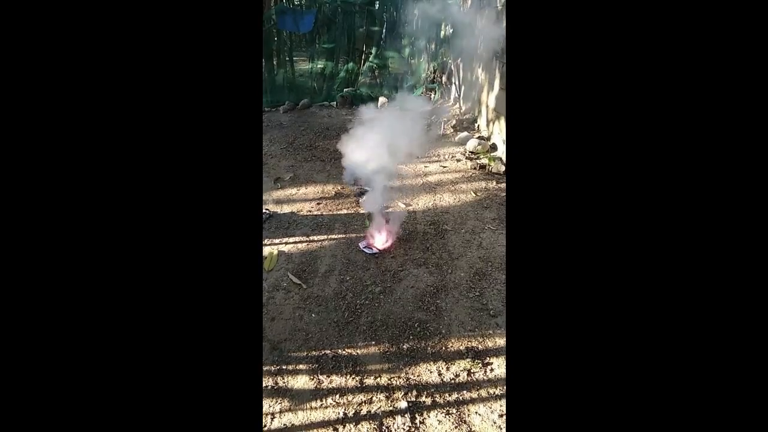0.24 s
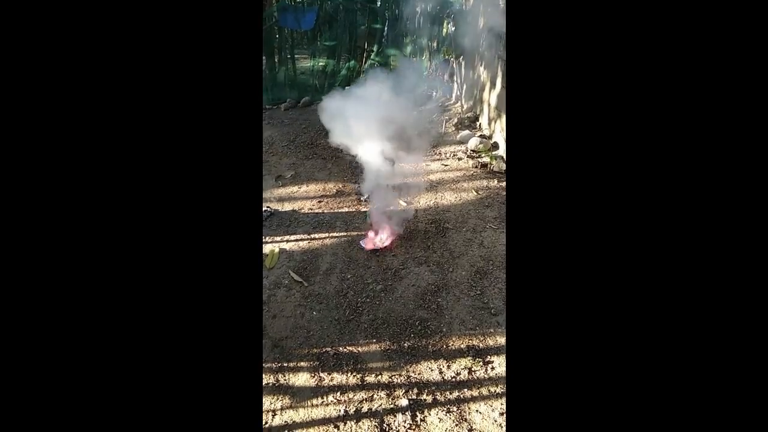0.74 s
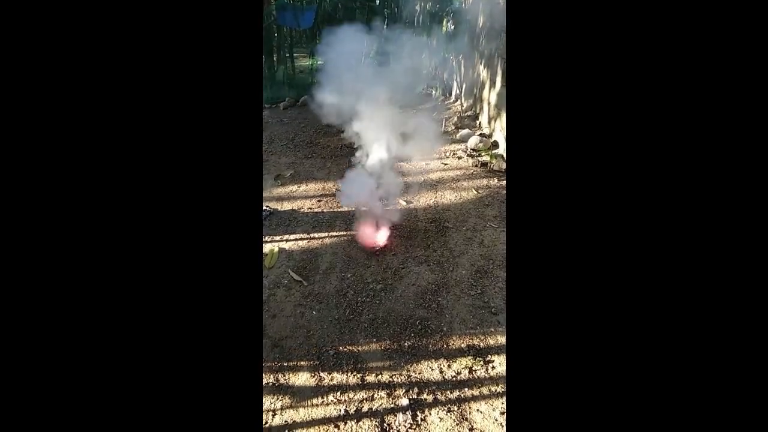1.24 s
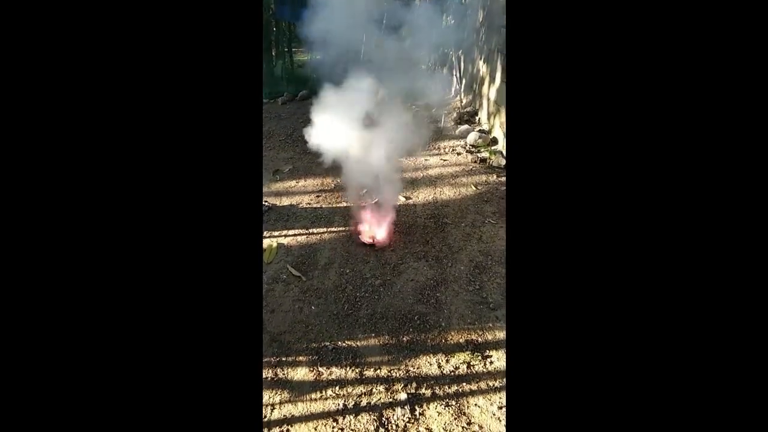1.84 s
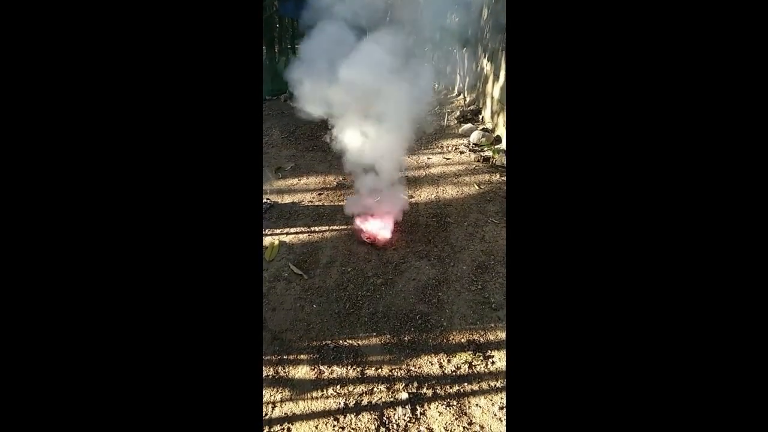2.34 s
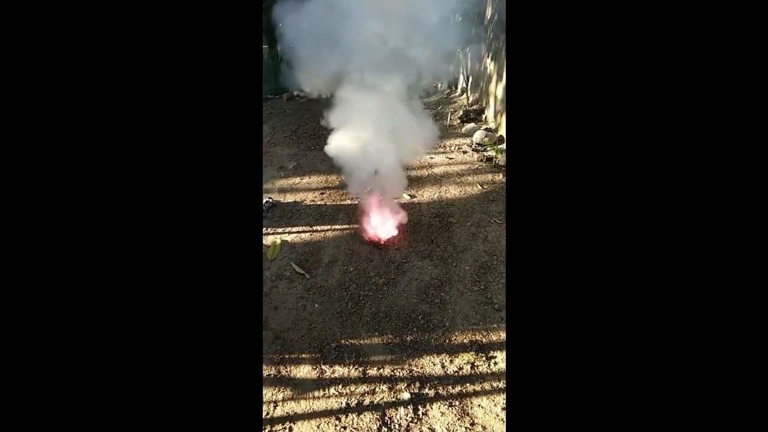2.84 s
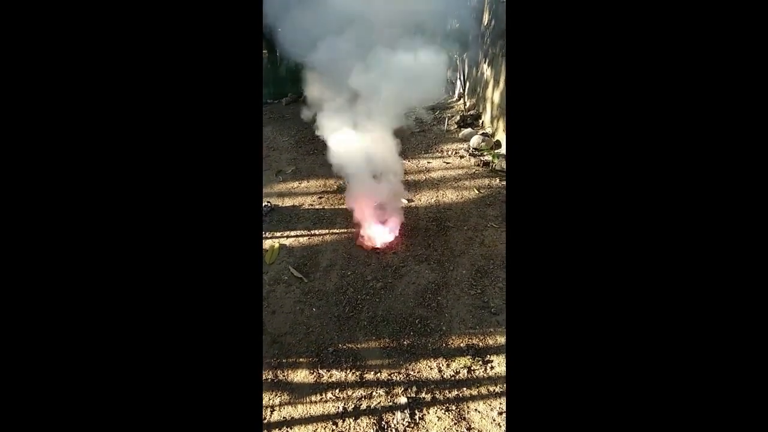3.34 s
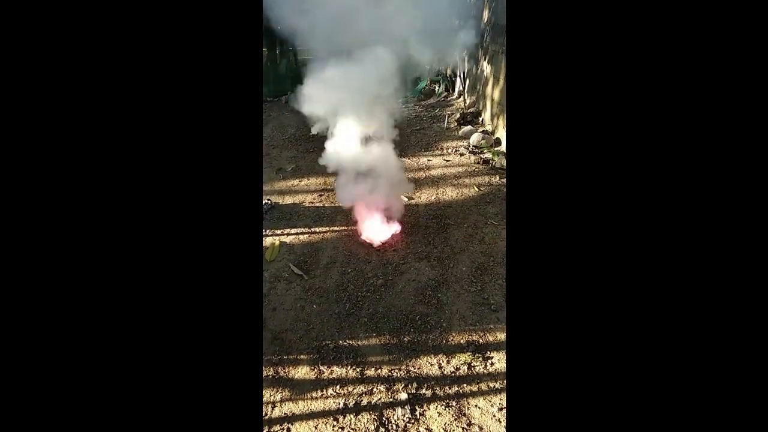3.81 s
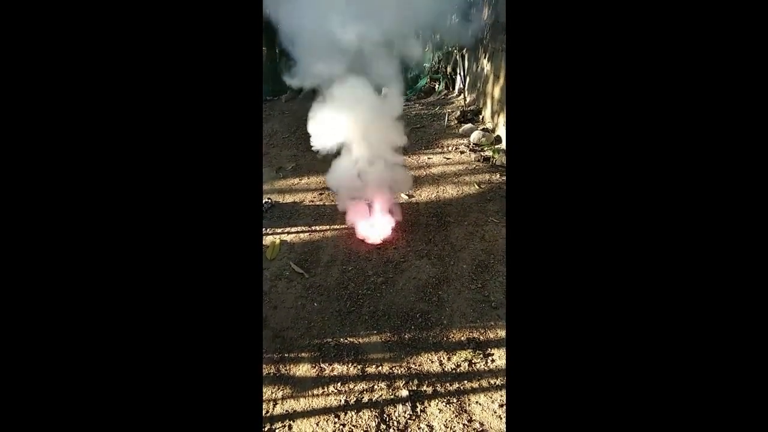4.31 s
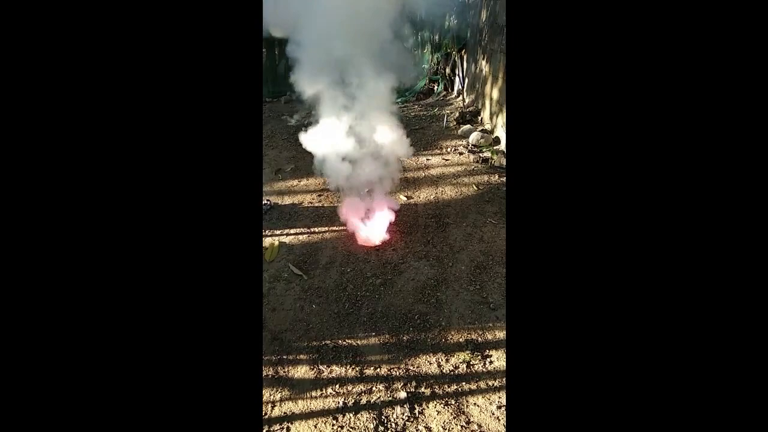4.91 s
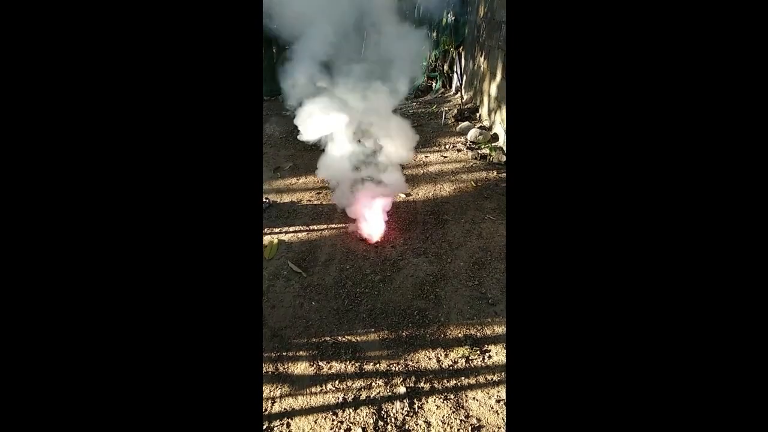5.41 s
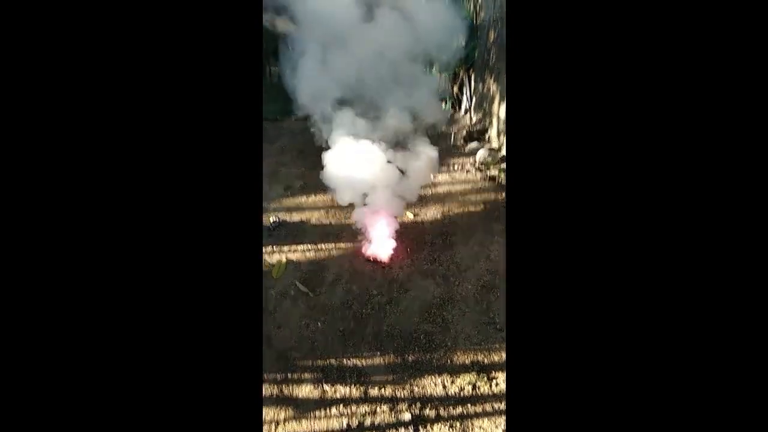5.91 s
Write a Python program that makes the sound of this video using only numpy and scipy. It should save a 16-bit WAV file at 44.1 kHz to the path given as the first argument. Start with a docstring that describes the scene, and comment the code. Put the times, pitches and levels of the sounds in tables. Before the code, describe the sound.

A homemade smoke bomb burns on bare ground outdoors, its bright gassy hiss gradually building with brief flares, fine sizzling and a few sharp snaps.

```python
"""Homemade smoke bomb burning outdoors

It burns on bare ground, a few metres from a hand-held phone. The smoke plume roars softly (low noise),
gas hisses from vents, cracks and pores (bands of noise) and the melt sizzles (random clicks), all growing.
Brief flares lift the hiss, gas pockets burst with a snap (ringing pulses), and the colour of the hiss flickers.
Nearby surfaces add short, dull reflections."""
import sys
import numpy as np
from scipy import signal
from scipy.fft import rfft, irfft
from scipy.io import wavfile
from scipy.ndimage import uniform_filter1d

SR = 44100
rng = np.random.default_rng(int(sys.argv[2]) if len(sys.argv) > 2 else 0)


def int16_out(signal):
    """Quantize to a 16-bit WAV file."""
    q = np.round(np.clip(np.atleast_2d(signal).T, -1, 1) * 32767)
    wavfile.write(sys.argv[1], SR, q.astype(np.int16))


N = 271656
TIME_S = np.arange(N) / SR
HZ = np.arange(N // 2 + 1) * SR / N

# The noise spectrum of the smoke plume. Each row: frequency in Hz, relative level in dB.
PLUME_SPECTRUM = [(25, -58), (60, -34), (100, -16.5), (132, -8), (155, 3), (200, 0.9), (270, -0.2),
                  (340, -0.6), (400, -7), (450, -0.8), (540, -8.5), (630, -1), (690, -5), (750, -1),
                  (860, -5.5), (1100, -8), (1800, -7), (2800, -7), (5000, -16.5), (16000, -49)]
# The noise spectrum of the wide vents. Each row: frequency in Hz, relative level in dB.
VENT_SPECTRUM = [(500, -47), (1500, -15.5), (2800, -4.5), (3700, 2), (5200, 3.5), (6500, -12), (9000, -9),
                 (16000, -26)]
# The noise spectrum of the cracks. Each row: frequency in Hz, relative level in dB.
CRACK_SPECTRUM = [(2000, -59), (5000, -18), (6200, -1.5), (7600, 0), (8200, 1), (9500, -1), (11000, -9),
                  (16000, -39)]
# The noise spectrum of the fine pores. Each row: frequency in Hz, relative level in dB.
PORE_SPECTRUM = [(2000, -37), (6000, -20.5), (8500, -7), (9600, -4), (10700, 1), (12000, -2), (14000, -8),
                 (15700, -8)]
# The steady burn, before the level trims in jets(). Each row: time in seconds, hiss of the fine pores in dB,
# hiss of the cracks in dB, rush of the wide vents in dB, left minus right in dB (its average is taken out).
STEADY_BURN = [(0.0, -35.5, -45, -46, 1), (0.3, -34, -42.5, -46.5, 2), (0.62, -32.5, -40.5, -43, 0),
               (0.93, -32.5, -41, -43, 2.5), (1.25, -30.5, -40, -42, 2.5), (1.45, -30, -37, -41, 1.5),
               (1.62, -31, -41, -43, 3), (1.8, -29.5, -37.5, -39, 1.5), (1.98, -32.5, -36.5, -43, -0.5),
               (2.2, -31, -37, -41, 2.5), (2.8, -30.5, -37, -43.5, 1.5), (3.0, -30.5, -39.5, -41.5, 3),
               (3.35, -29.5, -37.5, -40.5, 1.5), (3.67, -30, -39, -41, 3.5), (3.92, -31.0, -41.5, -41.5, 3),
               (4.3, -29.5, -37.5, -40, 3), (5.15, -29, -38, -41, 2.5), (5.4, -27, -35, -40.5, 1.5),
               (5.99, -29.5, -38.5, -41.5, 2), (6.16, -29.5, -36.5, -37, 2)]
# Flare-ups as fresh fuel catches. Each row: start in seconds, time until it dies away in seconds,
# rise of the hiss in dB, rise of the wide vents in dB (a very short flare stops just under its full rise).
FLARE_UPS = [(0.75, 0.09, 0.3, 3), (0.998, 0.1, 3, 3), (2.897, 0.11, 1.5, 3), (3.401, 0.063, 1.5, 4.2),
             (3.508, 0.035, 0, 1), (4.656, 0.084, 0.6, 0), (5.274, 0.082, 1, -2), (5.517, 0.06, 2.5, -1),
             (5.728, 0.2, 1.5, 3), (6.048, 0.061, 3, 2)]
# Bursting gas pockets. Each row: time in seconds, level in dB before the trim in pops(), pitch of the snap in Hz,
# thud in dB next to the snap, ring of the crust in dB next to the snap, left minus right in dB.
GAS_POCKETS = [(2.2956, -0.5, 14000, -4.5, 8, 3), (2.2997, -0.5, 14400, -32, -24, 5),
               (3.4256, -3, 9200, -11, -10, -4), (3.433, -7, 10300, -16, -8, 2),
               (3.5303, -6, 11000, -22, -6, 8), (5.547, -1, 10400, -14, -6, 5),
               (5.5495, -2, 12400, -30, -22, 6), (5.551, 0, 12400, -30, -18, 4),
               (5.552, 1, 10000, -26, -16, 5)]
# Reflections from things near the phone, before dulling. Each row: delay in seconds,
# signed gain at the left port, signed gain at the right port.
REFLECTIONS = [(.00172, -0.066, 0.15), (.00211, 0.21, 0.2), (.00361, 0.39, 0.57), (.00646, -0.13, -0.16)]
# How alike the two microphone ports hear the noise. Each row: frequency in Hz, likeness from 0 to 1,
# lead of the right port in radians.
PORT_LIKENESS = [(30, .6, 0), (130, .997, 0), (280, .985, 0), (400, .88, 0), (800, .92, 0), (1300, .62, .2),
                 (2200, .7, .8), (3000, .22, 2.1), (3900, .22, 2.3), (4300, .98, 3.12), (4680, .98, 3.17),
                 (5200, .15, 4), (5750, .6, 6.1), (6100, .84, 6.3), (7000, .2, 8.4), (7750, .9, 9.4),
                 (8500, .15, 8), (11000, .12, 6.3), (15000, .15, 8.5)]
# Resonances of the left port. Each row: pitch in Hz, width in Hz, height in dB next to the direct sound.
LEFT_PORT_RESONANCES = [(335, 49, -10.5), (1285, 37, 5), (2180, 122, 5), (6470, 140, -7),
                        (9750, 270, -17.5), (11100, 370, -8.5), (12620, 650, 1.5), (13570, 340, 9),
                        (14450, 400, -3)]

# the roar of the plume: final level, how far below it starts, time constant of the growth
ROAR_DB, ROAR_GROWTH_DB, ROAR_GROWTH_S = -39, 5.5, 3.1
FLARE_ATTACK_S, FLARE_RELEASE_S = 0.037, 0.022
# for each dB that a flare lifts the hiss: rise of the cracks in dB, swing to the right in dB
FLARE_CRACKS, FLARE_SWING = 1.3, 0.55
ECHO_DULL_HZ = 3740  # here the reflections are down to half
TOP_HZ = 15680  # the treble above this is cut off


def undb(db):
    """Turn decibels into gain."""
    return 10 ** (np.asarray(db) / 20)


def unit(x):
    """Scale to an rms (average strength) of 1."""
    return x / np.sqrt(np.mean(x ** 2))


def curves(table):
    """Join the columns of a table by straight lines in time."""
    times, *columns = np.transpose(table)
    return [np.interp(TIME_S, times, column) for column in columns]


def pan(db):
    """Left and right gains for a level difference."""
    return undb(np.array([[.5], [-.5]]) * db)


def walk(rate):
    """A wandering curve of rms 1: random levels held for 1 / rate seconds, then smoothed twice."""
    hold = max(int(SR / rate), 1)
    steps = np.repeat(rng.standard_normal(N // hold + 1), hold)
    smooth = uniform_filter1d(uniform_filter1d(steps, hold), hold)
    return unit(smooth[:N])


def resonance(hz, width_hz):
    """Complex response of one resonance, gain 1 at its centre."""
    return 1j * HZ * width_hz / (hz ** 2 - HZ ** 2 + 1j * HZ * width_hz)


def colour(x, spectrum):
    """Give a pair of noises a spectrum and the likeness that they have at the two ports."""
    hz, db = np.transpose(spectrum)
    gain = undb(np.interp(np.log(HZ + 1), np.log(hz), db))
    port_hz, alike, lead = np.transpose(PORT_LIKENESS)
    alike = np.clip(np.interp(HZ, port_hz, alike), 0, 1)
    lead = np.interp(HZ, port_hz, lead)
    left, other = rfft(x)
    # the right port hears a turned share of the left noise, filled up with unrelated noise
    right = alike * np.exp(1j * lead) * left + np.sqrt(1 - alike ** 2) * other
    return unit(irfft(np.array([left, right]) * gain, N))


def turbulence():
    """Churning gas makes noise: two unrelated white noises."""
    return rng.standard_normal((2, N))


def plume(flutter_db=0.5):
    """The hot column of smoke roars low and flutters, growing with the fire and levelling off."""
    roar_db = ROAR_DB - ROAR_GROWTH_DB * np.exp(-TIME_S / ROAR_GROWTH_S)
    return colour(turbulence(), PLUME_SPECTRUM) * undb(roar_db + flutter_db * walk(14))


def pops(gain_db=-1.0, snap_width_hz=5000, spray_db=-21, spray_s=0.002):
    """Each pocket bursts with a pressure pulse that rings the crust, then a brief, bright spray of gas."""
    out = np.zeros((2, N))
    crust = resonance(6200, 1000)
    thud = 2.36 * resonance(2170, 700) + resonance(2900, 1220)
    age = np.arange(SR // 50) / SR
    for start, db, snap_hz, thud_db, crust_db, pan_db in GAS_POCKETS:
        spray = undb(spray_db) * rng.standard_normal((2, len(age))) * np.exp(-age / spray_s)
        snap = (1 + rfft(spray, N)) * resonance(snap_hz, snap_width_hz)  # the 1 is the pulse
        burst = snap + undb(thud_db) * thud + undb(crust_db) * crust
        delay = np.exp(-2j * np.pi * HZ * start)
        out += irfft(burst * delay, N) * undb(db + gain_db) * pan(pan_db)
    return out


def sizzle(per_s, spread_db):
    """Countless tiny bubbles burst in the melt as single clicks; few are large."""
    size = undb(spread_db * np.minimum(rng.exponential(size=N), np.pi))
    bursts = rng.random(N) < per_s / SR
    return unit(bursts * size * rng.choice([-1, 1], (2, N)))


def sputter(db, rate, swell_db, swell_rate=12):
    """Jets flicker quickly, differently towards each port, on top of small shared swells."""
    each_port = np.array([walk(rate), walk(rate)])
    return undb(db * each_port + swell_db * walk(swell_rate))


def flares():
    """Rise of the hiss and of the wide vents in dB: fresh fuel catches, burns on and dies away."""
    rises = 0
    for start, length, *db in FLARE_UPS:
        climb = np.clip((TIME_S - start) / FLARE_ATTACK_S, 0, 1)
        dying = np.exp(-np.maximum(TIME_S - start - length, 0) / FLARE_RELEASE_S)
        rises = rises + np.outer(db, climb * dying)
    return rises


def jets(crack_gain_db=2.77, hiss_gain_db=-0.48, rush_gain_db=0.16, sizzle_db=-9):
    """Gas leaves by wide vents, cracks and fine pores; all follow the burn and flares, each sputters alone."""
    hiss_db, crack_db, rush_db, pan_db = curves(STEADY_BURN)
    flare_db, vent_flare_db = flares()

    rush_db = rush_db + rush_gain_db + vent_flare_db + 0.8 * walk(140)
    rush = colour(turbulence(), VENT_SPECTRUM) * undb(rush_db)

    crack_db = crack_db + crack_gain_db + FLARE_CRACKS * flare_db
    cracks = colour(turbulence(), CRACK_SPECTRUM) * undb(crack_db)
    cracks = cracks * sputter(0.8, rate=90, swell_db=1.0)

    pores = unit(turbulence() + undb(sizzle_db) * sizzle(per_s=3500, spread_db=7.5))
    hiss = colour(pores, PORE_SPECTRUM) * undb(hiss_db + hiss_gain_db + flare_db)
    hiss = hiss * sputter(0.75, rate=170, swell_db=0.38)

    # the fine jets beam their treble, so it sways between the ports
    sway_db = pan_db - np.mean(pan_db) - FLARE_SWING * flare_db
    return rush + (cracks + hiss) * pan(sway_db)


def flicker(x, db, rate, low_hz, high_hz, count):
    """The sound flickers in colour: narrow bands dip and return, each keeping its average strength."""
    centres = np.linspace(low_hz, high_hz, count)
    spectrum = rfft(x)
    dips = [unit(undb(db * np.minimum(walk(rate), 0))) for _ in centres[1:-1]]
    gains = [1, *dips, 1]  # the outermost bands stay steady
    out = 0
    for band, gain in zip(np.eye(count), gains):
        shape = np.interp(HZ, centres, band)  # overlapping triangles that add up to 1
        out = out + irfft(spectrum * shape, N) * gain
    return out


def reflections():
    """Nearby things send back delayed, dulled copies, which ripple the spectrum differently at each port."""
    echo = sum(np.outer(gains, np.exp(-2j * np.pi * HZ * delay)) for delay, *gains in REFLECTIONS)
    return echo / (1 + (HZ / ECHO_DULL_HZ) ** 2)


def scene():
    """The plume and the flickering jets, the pops, and the reflections of them all."""
    burn = flicker(plume() + jets(), db=22.5, rate=28, low_hz=2488, high_hz=9434, count=58)
    fire = burn + pops()
    return irfft(rfft(fire) * (1 + reflections()), N)


def record(dry):
    """The left port of the phone rings at its resonances; the top of the treble is cut off."""
    port = 1 + sum(undb(db) * resonance(hz, width) for hz, width, db in LEFT_PORT_RESONANCES)
    left = irfft(rfft(dry[0]) * port, N) * undb(-0.06)
    heard = np.array([left, dry[1]])
    treble_cut = signal.ellip(12, .1, 80, TOP_HZ, fs=SR, output="sos")
    return signal.sosfilt(treble_cut, heard)


dry = scene()
out = record(dry)
int16_out(out)
```